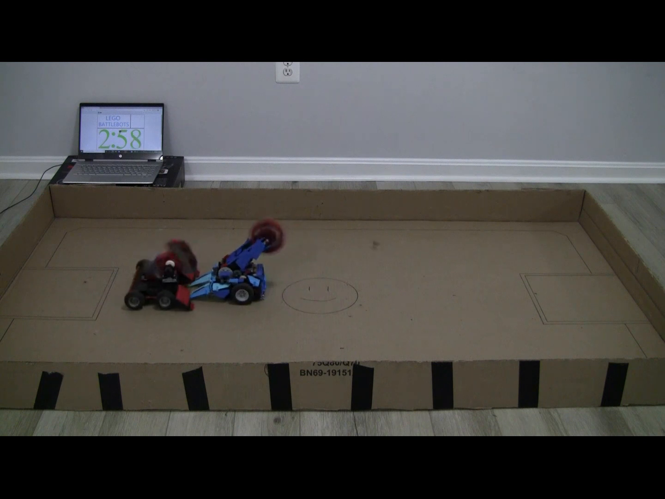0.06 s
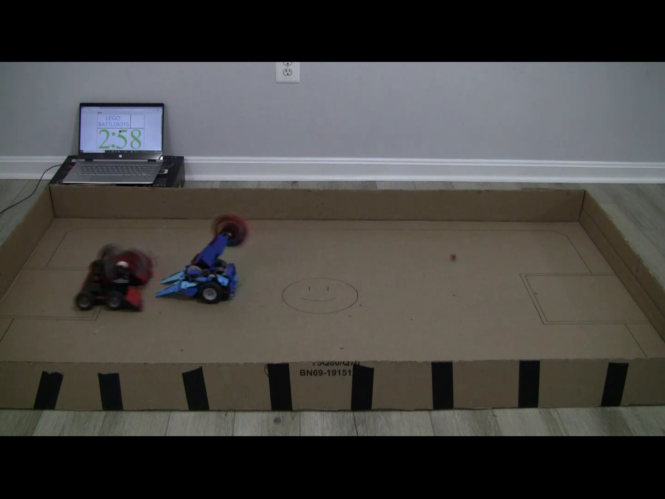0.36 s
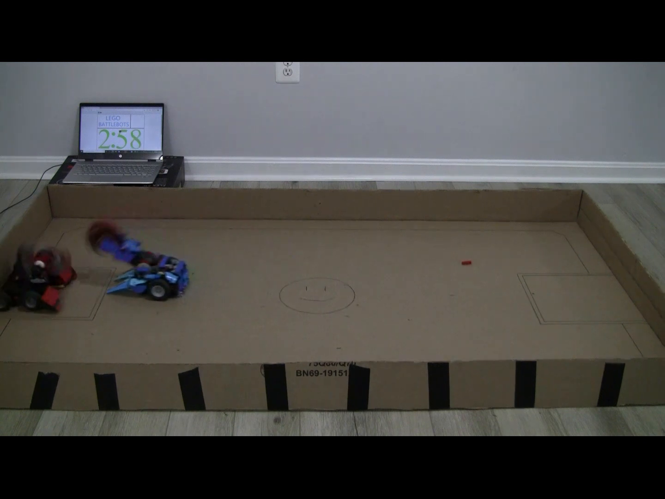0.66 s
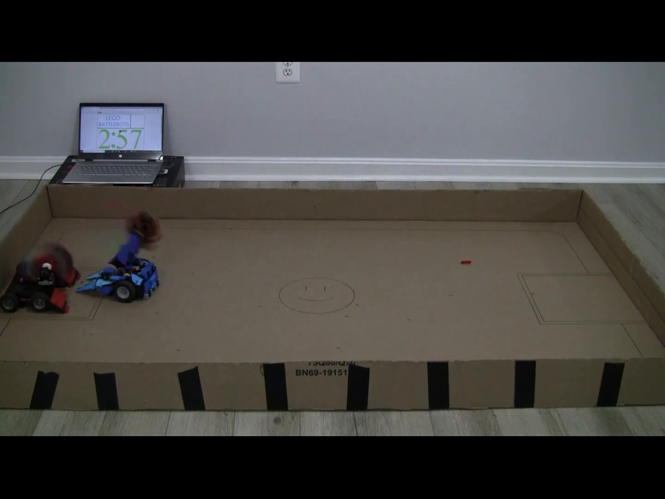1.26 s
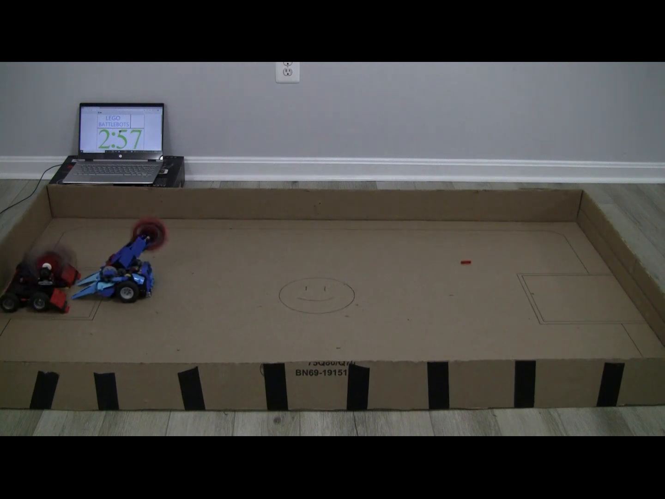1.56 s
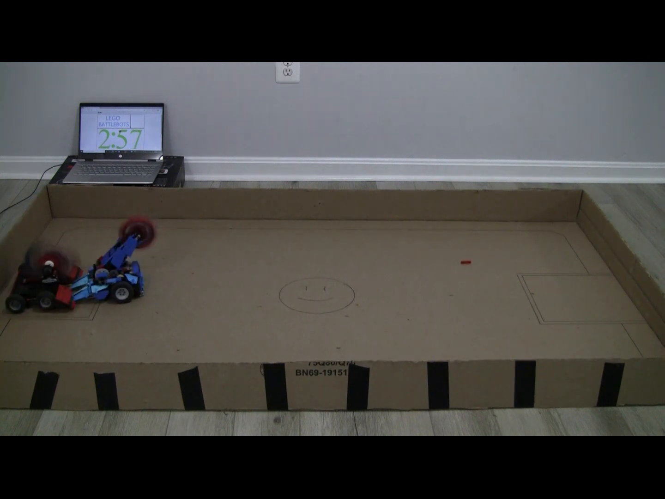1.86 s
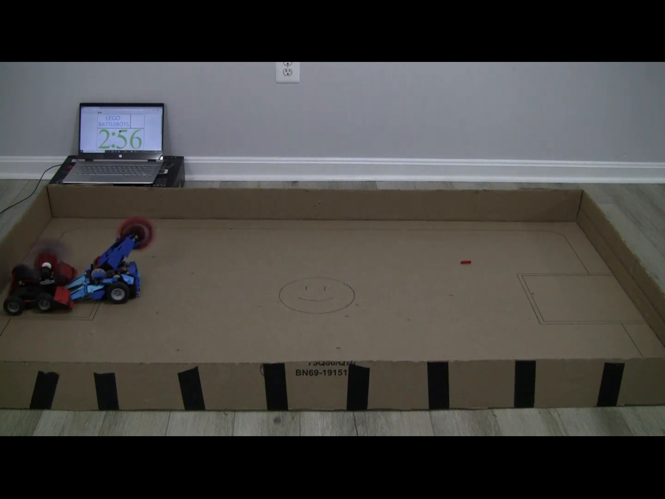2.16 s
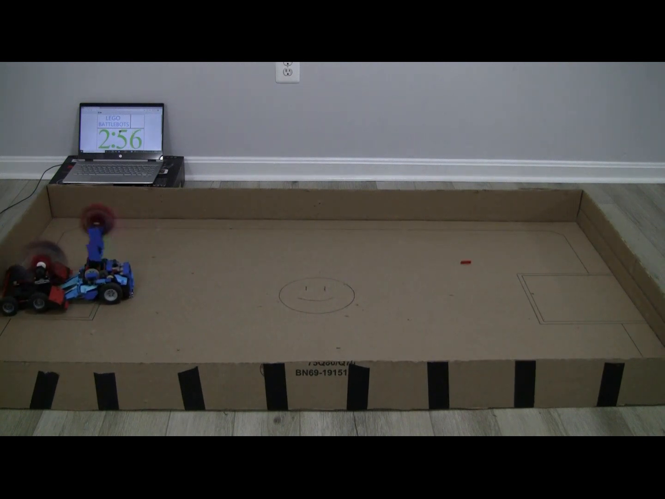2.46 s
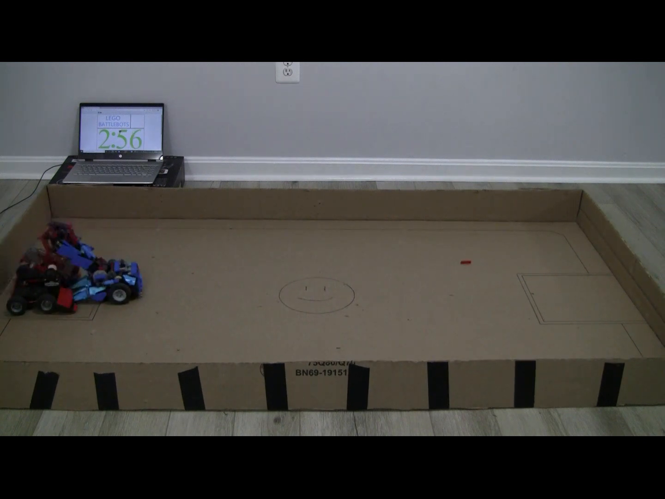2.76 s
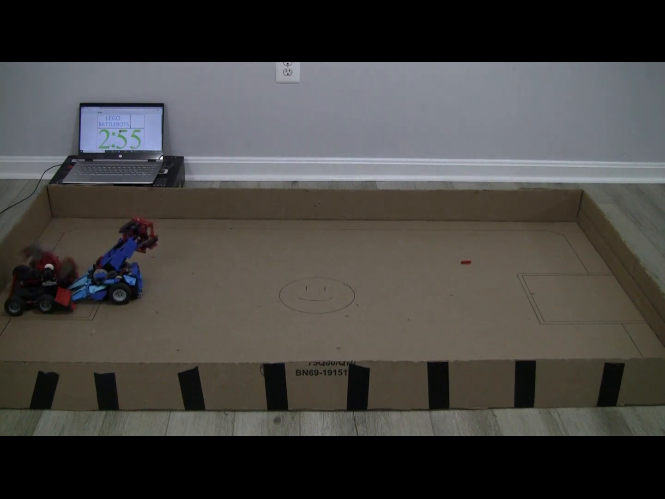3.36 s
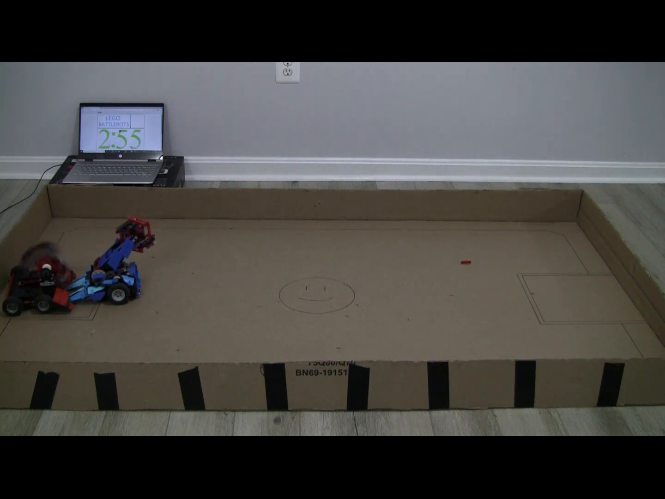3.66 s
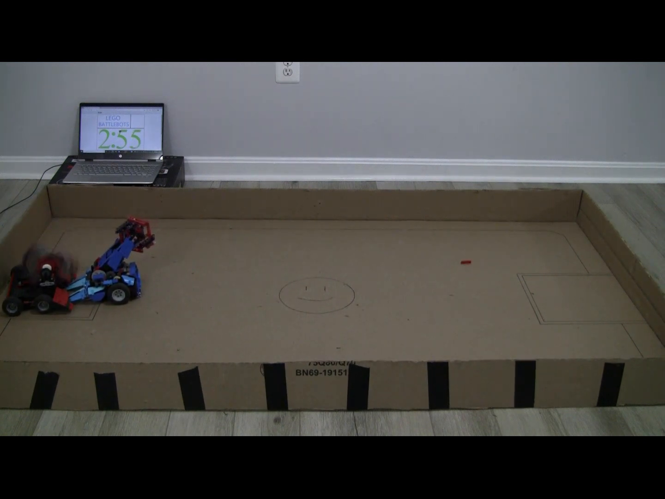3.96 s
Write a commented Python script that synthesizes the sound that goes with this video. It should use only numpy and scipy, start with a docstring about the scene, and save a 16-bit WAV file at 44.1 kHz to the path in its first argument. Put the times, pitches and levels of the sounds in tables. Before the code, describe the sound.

A small geared spinner whines and rattles as toy robots crash and scrape together indoors.

```python
"""A cardboard arena in a small room, where two toy robots fight. A geared spinner whines up, is stalled
by a blow and starts again, its plastic gears rattling. Impacts excite the resonances of what they hit:
shells crack, the chassis knocks, the floor thumps, a metal part rings and a blade drums on the wall.
Stick-slip friction rasps as the robots grind and skid, over a low hum and a faint drone."""
import sys
import numpy as np
from scipy import signal
from scipy.fft import rfft, irfft
from scipy.io import wavfile
from scipy.ndimage import uniform_filter1d

SR = 44100
rng = np.random.default_rng(int(sys.argv[2]) if len(sys.argv) > 2 else 0)


def unload_audio(sound):
    """Save the sound as a 16-bit wav file, at the path given as the first command line argument."""
    columns = np.transpose(np.atleast_2d(sound))
    # keep every value between -1 and 1, then stretch to whole-number steps
    steps = np.round(np.clip(columns, -1, 1) * 32767)
    wavfile.write(sys.argv[1], SR, steps.astype(np.int16))


N = 176400

# course of the spinner: time_s, mesh_hz, whine_db, rattle_db
SPINNER_COURSE = [(0, 2220, -42, -28), (0.281, 1598, -34, -27), (.43, 2405, -31.5, -24.5),
                  (0.541, 2530, -53, -23.5), (.7, 2426, -24, -21), (1.0, 3145, -28, -25),
                  (1.251, 3473, -29, -24.5), (1.501, 4037, -29, -25), (1.72, 4410, -26, -24.5),
                  (2.169, 4890, -22, -26), (2.57, 5160, -28, -25), (2.6, 2060, -56, -16.5),
                  (2.96, 2000, -43, -30.5), (3.04, 2153, -31, -35.5), (3.09, 2100, -54, -30.5),
                  (3.48, 1745, -43, -39.5), (3.55, 1750, -35.5, -36), (3.68, 1942, -40, -32.5),
                  (3.819, 2352, -33.5, -31.5), (4, 2733, -31, -29)]
# partials of the whine: mesh_multiple, slow_db, fast_db
WHINE_PARTIALS = [(0.499, -26, -14), (1, 3.5, 1), (1.47, -3, -12), (2, -2, -13.5)]
# rattle spectra at high and low speed: frequency_hz, gain_db
RATTLE_FAST = [(150, -17.5), (400, -18), (750, -9), (1100, -11), (1600, -6), (2300, -1.5), (3600, -1.5),
               (5500, -1.5), (7600, -5.5), (8700, -8.5), (10000, -9.5), (12000, -14), (16000, -21.5)]
RATTLE_SLOW = [(150, -15), (600, -2.5), (1100, -4.5), (2000, -8), (3400, -1), (4400, -3), (5500, 0),
               (7500, -8), (10000, -13), (16000, -27.5)]
TEETH, FULL_SPEED_HZ = 44, 4160
MESH_JITTER, SLOW_JITTER, FLUTTER_DB, STUTTER_DB = 0.0261, 0.0122, 4, 4.5


def spinner():
    """Gear meshing: teeth whine at their contact rate and rattle, rough when slow, brighter at speed."""
    times, *columns = np.array(SPINNER_COURSE).T
    mesh_hz, whine_db, rattle_db = (np.interp(clock(), times, column) for column in columns)
    fast = np.clip(mesh_hz / FULL_SPEED_HZ, 0, 1) ** 3
    slow = 1 - fast
    jitter = (MESH_JITTER + SLOW_JITTER * slow) * wander(454) + .005 * wander(25.22)
    phase = 2 * np.pi * np.cumsum(mesh_hz * (1 + jitter)) / SR
    whine = sum(undb(slow * slow_db + fast * fast_db + FLUTTER_DB * wander(190)) * np.sin(k * phase)
                for k, slow_db, fast_db in WHINE_PARTIALS)
    whine = unit(whine * undb(STUTTER_DB * slow * wander(41)))
    throb = 1 + 0.29 * np.sin(phase / TEETH)  # once per turn
    teeth = unit(clicks(per_s=2600, spread_db=1) * throb * undb(1.8 * wander(106)))
    rattle = fast * colour(teeth, RATTLE_FAST) + slow * colour(teeth, RATTLE_SLOW)
    return undb(whine_db) * whine + undb(rattle_db) * rattle


# collisions, in relative levels: start_s, floor_db, chassis_db, shell_db, edge_db, chatter_decay_s
BLOWS = [(0.027, -15, -13, -35, -38, 0.0063), (0.047, -9.5, -10, -16, -20, 0.022),
         (0.103, -28, -12.5, -34, -27, 0.016), (0.22, -46, -27, -24, -40, 0.035),
         (.534, -33, -10, -43, -24, 0.012), (0.556, -42, -17, -42, -18, 0.023),
         (0.61, -9.5, -28, -42, -33, 0.0068), (.641, -28, -21, -24, -41, 0.0072),
         (0.675, -13.5, -22, -44, -34, 0.019), (0.937, -35, -41, -27, -18.5, 0.024),
         (1.207, -59, -56, -29, -29, 0.018), (1.438, -32.5, -30, -21.5, -20, .02),
         (2.292, -38, -52, -34, -42, 0.014), (2.424, -34, -46, -42, -42, 0.021),
         (2.603, -16.5, -20, -19.5, -18, 0.01), (2.727, -29.5, -29.5, -32, -37, 0.0096),
         (2.763, -32, -36, -29, -32, 0.017), (2.927, -39.5, -39, -25.5, -34.5, 0.024),
         (3.147, -27, -32, -30, -42, 0.011), (3.165, -44, -43, -25.5, -22, 0.0079)]
CONTACT_S, CHATTER_DB, CHATTER_PER_S, BLOW_GAIN_DB = 0.0011, -0.5, 700, -10


def blows(part):
    """Impact force on one part: a short contact, then the dying chatter of loose pieces."""
    force, age = np.zeros(N), clock()[:SR // 4]
    for start, *levels_db, decay in BLOWS:
        contact = unit(rng.standard_normal(len(age)) * np.exp(-age / CONTACT_S))
        bounces = (rng.random(len(age)) < CHATTER_PER_S / SR) * rng.standard_normal(len(age))
        chatter = undb(CHATTER_DB) * unit(bounces * np.exp(-age / decay))
        first = int(start * SR)
        force[first:first + len(age)] += undb(levels_db[part] + BLOW_GAIN_DB) * unit(contact + chatter)
    return force


# sliding contacts: start_s, length_s, floor_db, chassis_db, shell_db, edge_db
GRINDS = [(0, 0.011, -40, -17.5, -15, -20.5), (0.03, 0.096, -35, -21, -22.5, -27),
          (0.543, 0.05, -51, -17.5, -35, -19), (0.604, 0.18, -24, -18.5, -21, -23),
          (0.764, 0.13, -29.5, -23.5, -28, -35), (.93, 0.092, -49, -30.5, -34.5, -34.5),
          (2.604, 0.17, -39, -30.5, -21.5, -27.5), (3.125, 0.035, -43, -39, -30.5, -31),
          (3.187, 0.059, -37.5, -36, -31.5, -49)]


def grinding(part):
    """Friction force on one part while the robots rub together."""
    return sum(stick_slip(start, length, levels_db[part], per_s=1200)
               for start, length, *levels_db in GRINDS)


# responses of the struck parts: frequency_hz, gain_db
FLOOR = [(30, -20), (75, -30), (110, -18), (160, -2), (230, 0.5), (320, 2.5), (430, 0), (600, -2),
         (1200, -34), (5000, -74)]
CHASSIS = [(80, -26.5), (200, -17.5), (350, -10), (520, 2), (700, 2.5), (1000, -1), (1500, -3),
           (2200, -7.5), (4000, -26.5), (12000, -54)]
SHELL = [(200, -44), (900, -23), (1500, -4.5), (2200, 1.5), (3000, -2.5), (4200, 3), (5500, -7.5),
         (8000, -6), (16000, -27)]
EDGE = [(500, -68), (3000, -21), (5500, 5.5), (7500, 6), (10000, 3.5), (13000, -2.5), (16000, -14)]


def collisions():
    """Forced vibration: each part filters the impact and friction forces that drive it."""
    return sum(colour(blows(part) + grinding(part), body)
               for part, body in enumerate((FLOOR, CHASSIS, SHELL, EDGE)))


# hard weapon strikes: start_s, thud_db, chassis_db, shell_db, snap_db, decay_s
STRIKES = [(.412, -45, -23, -17.5, -37, 0.0043), (.534, -40, -11.5, -34, -16, 0.01),
           (0.7496, -1, -16, -2.5, -22, 0.002), (0.7549, -11, -8, -7, -28, 0.0036),
           (2.5883, -42, -28, -6.5, -8.5, 0.0014), (2.594, -45, -35, -18.5, -11.5, .005),
           (3.1627, -38, -32, -16.5, -21, 0.0025)]
# spectrum of the snap: frequency_hz, gain_db
SNAP = [(500, -20), (3000, 9), (7500, 9), (11000, 11), (15000, -6)]
THUD_HZ, THUD_DECAY_S = 345, 0.003


def strikes():
    """Broadband excitation: a brief, hard contact gives a cardboard thud, a knock, a crack and a snap."""
    forces, age = np.zeros((4, N)), clock()[:SR // 16]
    thud = np.sin(2 * np.pi * THUD_HZ * age) * np.exp(-age / THUD_DECAY_S)
    for start, *levels_db, decay in STRIKES:
        bursts = rng.standard_normal((3, len(age))) * np.exp(-age / decay)
        first = int(start * SR)
        forces[:, first:first + len(age)] += undb(levels_db)[:, None] * np.vstack([thud, bursts])
    thuds, *drives = forces
    return thuds + sum(colour(drive, body) for drive, body in zip(drives, (CHASSIS, SHELL, SNAP)))


# rasping bands (blade skids, and the chassis resonating low after the stalling blow):
# start_s, length_s, level_db, pitch_hz, relative_width
RASPS = [(0, 0.13, -16.5, 2240, 0.52), (0.403, 0.079, -23, 2250, 0.45), (0.544, 0.043, -21.5, 7540, 0.44),
         (0.747, 0.1, -16.5, 3950, 0.51), (0.827, 0.1, -25.5, 3930, 0.39), (2.607, 0.14, -26, 402, 0.27)]


def rasps():
    """Band resonance: dense clicks excite one broad band, as a blade skids or the chassis resonates."""
    rasp = np.zeros(N)
    for start, length, db, hz, width in RASPS:
        band = signal.butter(2, hz * np.exp([-width / 2, width / 2]), "bandpass", fs=SR, output="sos")
        resonance = signal.sosfilt(band, signal.unit_impulse(2048))
        rasp += convolve(stick_slip(start, length, db, per_s=1700), resonance)
    return rasp


# modes of the cardboard: pitch_hz, level_db, t60_s
CARDBOARD_MODES = [(149.4, -3.5, 0.98), (236, 0, 0.15), (263, 5, 0.44), (300, 15, 0.33), (410, 3, 0.1)]
DRUM_START_S, DRUM_LENGTH_S, DRUM_PER_S = .611, 0.11, 75.3
DRUM_DB, DRUM_FADE_DB_PER_S, DRUM_SCATTER_DB = -22, 86, 0.5


def drumming():
    """Periodic excitation: one ever weaker blow per turn of the blade keeps the wall booming."""
    ages = np.arange(0, DRUM_LENGTH_S, 1 / DRUM_PER_S)
    levels_db = DRUM_DB - DRUM_FADE_DB_PER_S * ages + DRUM_SCATTER_DB * rng.standard_normal(len(ages))
    return convolve(impulses(zip(DRUM_START_S + ages, levels_db)), ring(CARDBOARD_MODES))


# blow on the metal part: start_s, level_db
CLINKS = [(3.164, -19.5)]
# modes of the metal part: pitch_hz, level_db, t60_s
METAL_MODES = [(3350, -1, .18), (4970, -9, .3), (6700, 1.5, 0.2), (8540, 3, 0.2), (10550, -10, .25)]


def clink():
    """Free vibration: a loose metal part shakes as it rings, so its pitches wobble."""
    return convolve(impulses(CLINKS), ring(METAL_MODES, wobble=0.0119))


# tones of the hum: pitch_hz, level_db
HUM_TONES = [(110, -51.5), (177.6, -49.5), (726.7, -53.5)]


def hum():
    """Slow amplitude and frequency modulation makes each low tone waver."""
    tones = np.zeros(N)
    for hz, db in HUM_TONES:
        amplitude = np.sqrt(2) * undb(db + 2.2 * wander(10))
        pitch_hz = hz * (1 + 0.00953 * wander(15.6))
        tones += amplitude * np.sin(2 * np.pi * np.cumsum(pitch_hz) / SR)
    return tones


# spectrum of the drone: frequency_hz, gain_db
DRONE_SPECTRUM = [(25, -2), (70, -38), (105, 1), (170, -2), (300, -0.5), (500, -2.5), (750, -3.5),
                  (1000, -13), (2000, -5), (6000, -18.5), (16000, -80)]


def drone(level_db=-36.5):
    """Filtered noise: a steady, dark background."""
    return undb(level_db) * colour(rng.standard_normal(N), DRONE_SPECTRUM)


ROOM_T60_S, TREBLE_T60_S, ROOM_ONSET_S, COHERENT_BELOW_HZ = 0.57, 0.34, 0.001, 1180
ROOM_DB, CLOSE_SEND_DB, LEFT_LOUDER_DB, RIGHT_LAG_S = 6, -9, 2, 27e-6


def echoes():
    """Diffuse field: left and right tails are alike only in the bass, and the treble dies first."""
    t = clock()[:SR // 2]
    mid, side = rfft(rng.standard_normal((2, len(t))))
    hz = np.fft.rfftfreq(len(t), 1 / SR) + 1
    width = 1 / np.sqrt(1 + (COHERENT_BELOW_HZ / hz) ** 3.5) + 0.1
    noise = irfft(np.array([mid + width * side, mid - width * side]) / np.sqrt(1 + width ** 2))
    lows = signal.sosfilt(signal.butter(1, 4000, fs=SR, output="sos"), noise)
    tails = lows * undb(-60 * t / ROOM_T60_S) + (noise - lows) * undb(-60 * t / TREBLE_T60_S)
    return tails * (1 - np.exp(-t / ROOM_ONSET_S))


def room(diffuse, close):
    """Reverberation: direct sound plus echoes whose paths shift as the robots and their blades turn."""
    path_shares = np.array([wander(36.3) for _ in range(8)])
    path_shares /= np.linalg.norm(path_shares, axis=0)
    total_gain = np.hypot(1, undb(ROOM_DB))
    sent = diffuse + undb(CLOSE_SEND_DB) * close
    wet = sum(np.array([convolve(sent * share, tail) for tail in echoes()]) for share in path_shares)
    delays = [np.sinc(np.arange(-8, 9) + side * RIGHT_LAG_S * SR) for side in (.5, -.5)]
    direct = np.array([convolve(diffuse + total_gain * close, delay) for delay in delays])
    balance = undb(np.array([[.5], [-.5]]) * LEFT_LOUDER_DB)
    return balance * (direct + undb(ROOM_DB) * wet) / total_gain


def stick_slip(start, length, db, per_s, release_s=.03):
    """Stick-slip friction: surfaces catch and let go during contact, then the slips fade."""
    age = clock() - start
    envelope = (age > 0) * np.exp(-np.maximum(age - length, 0) / release_s)
    return undb(db) * envelope * clicks(per_s, spread_db=3)


def ring(modes, wobble=0):
    """Modal response: a sum of damped sines, whose pitch may wobble."""
    t, response = clock()[:SR], np.zeros(SR)
    for hz, db, t60 in modes:
        warped_time = np.cumsum(1 + wobble * wander(163)[:SR]) / SR
        response += undb(db - 60 * t / t60) * np.sin(2 * np.pi * hz * warped_time)
    return response


def impulses(rows):
    """Ideal impacts: each impulse has the energy of its level held for 30 ms."""
    force = np.zeros(N)
    for start, db in rows:
        force[int(start * SR)] = undb(db) * np.sqrt(.03 * SR)
    return force


def clicks(per_s, spread_db):
    """Poisson process: random clicks of uneven size, rms 1."""
    signs = (rng.random(N) < per_s / SR) * np.sign(rng.standard_normal(N))
    return unit(signs * undb(spread_db * rng.standard_normal(N)))


def wander(per_s):
    """Smoothed noise: a random drift, rms 1."""
    span = int(SR / per_s)
    return unit(uniform_filter1d(uniform_filter1d(rng.standard_normal(N), span), span))


def colour(x, points, size=4096):
    """Minimum-phase filter shaped by (Hz, dB) points, keeping the power of white noise."""
    hz, db = np.array(points).T
    curve_db = np.interp(np.log(np.fft.rfftfreq(size, 1 / SR) + 1), np.log(hz), db)
    cepstrum = irfft(np.log(undb(curve_db)))
    return convolve(x, irfft(np.exp(rfft(2 * cepstrum[:size // 2], size))))


def convolve(x, response):
    """Convolution with a response scaled to unit energy."""
    return signal.fftconvolve(x, response / np.linalg.norm(response))[:N]


def undb(db):
    """Decibels to gain."""
    return 10 ** (np.asarray(db) / 20)


def unit(x):
    """Scale to rms 1."""
    return x / np.sqrt(np.mean(x ** 2) + 1e-18)


def clock():
    """Time of each sample in seconds."""
    return np.arange(N) / SR


def scene():
    """Superposition in one room: strikes and drumming arrive mostly direct, the hum wholly so."""
    diffuse = spinner() + collisions() + clink() + rasps() + drone()
    return room(diffuse, close=strikes() + drumming()) + hum()


LOW_CUT_HZ, HIGH_CUT_HZ = 98, 16100
LIMIT_DB, LIMIT_ATTACK_S, LIMIT_RELEASE_S = -2.5, 0.0099, 0.2


def record(dry):
    """Peak limiting between low and high cuts: the gain ducks after loud peaks; what gets past clips."""
    dry = signal.sosfilt(signal.butter(2, LOW_CUT_HZ, "highpass", fs=SR, output="sos"), dry)
    fall = clock() / LIMIT_RELEASE_S
    log_level = np.log(np.abs(dry).max(axis=0) + 1e-9)
    peak = np.exp(np.maximum.accumulate(log_level + fall) - fall)
    reduction = 1 - np.minimum(1, undb(LIMIT_DB) / peak)
    slew = np.exp(-1 / (LIMIT_ATTACK_S * SR))
    gain = 1 - signal.lfilter([1 - slew], [1, -slew], reduction)
    high_cut = signal.ellip(8, .2, 70, HIGH_CUT_HZ, fs=SR, output="sos")
    return signal.sosfilt(high_cut, np.clip(dry * gain, -1, 1))


dry = scene()
out = record(dry)
unload_audio(out)
```